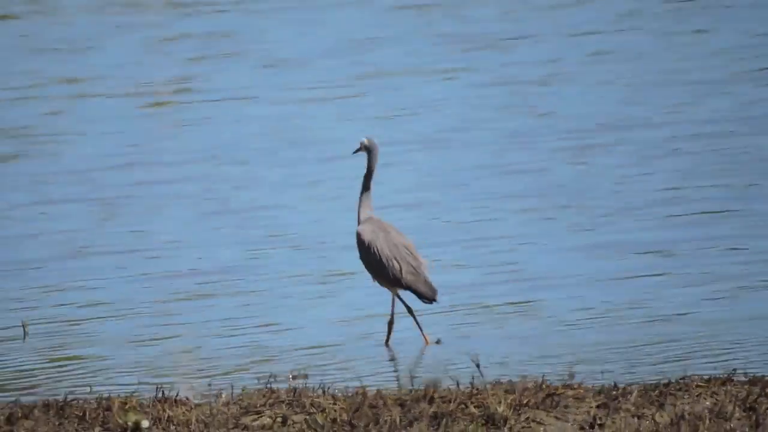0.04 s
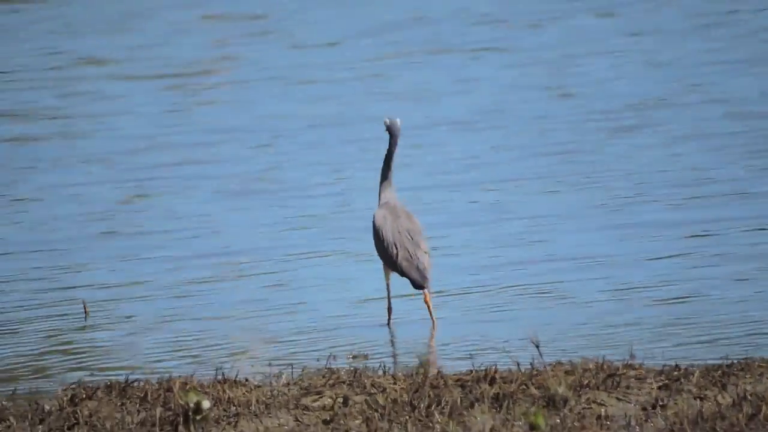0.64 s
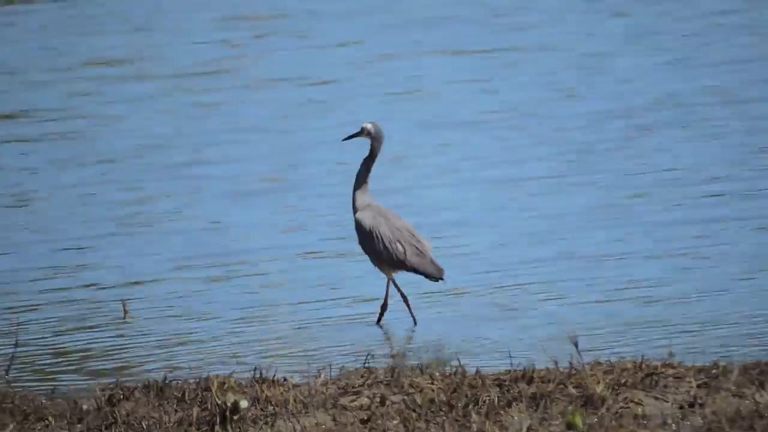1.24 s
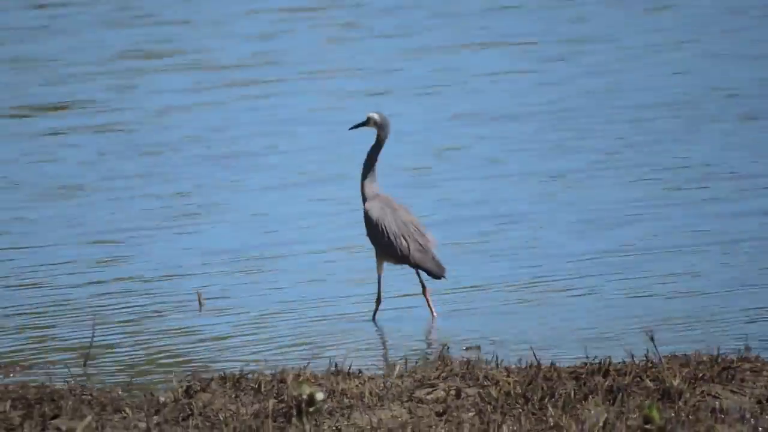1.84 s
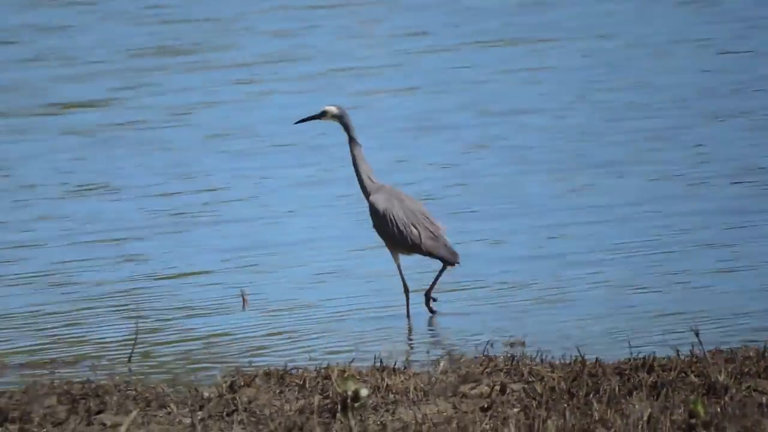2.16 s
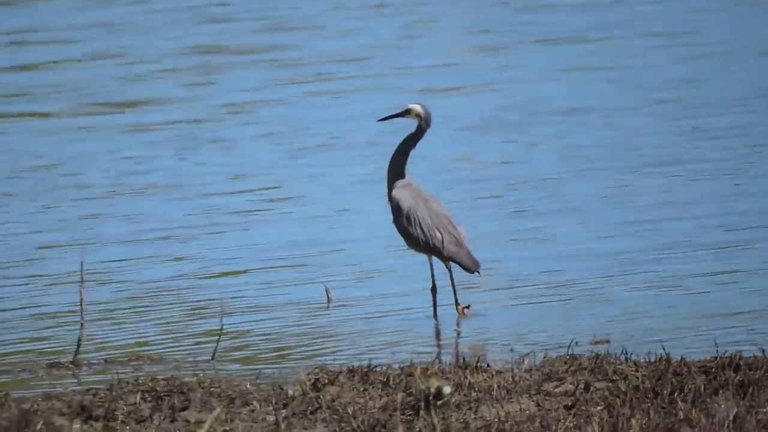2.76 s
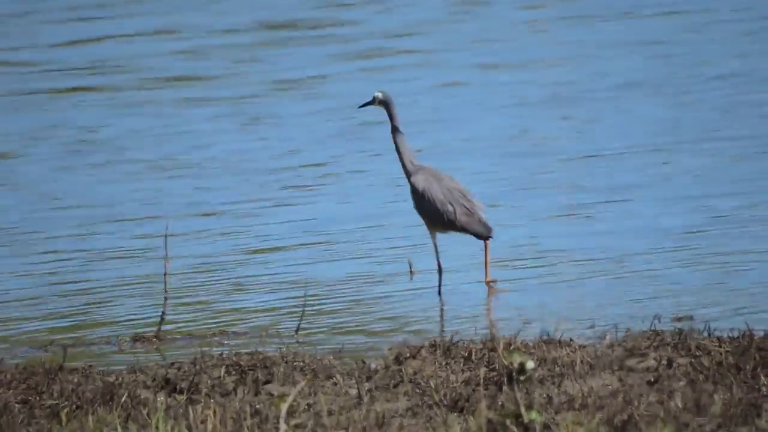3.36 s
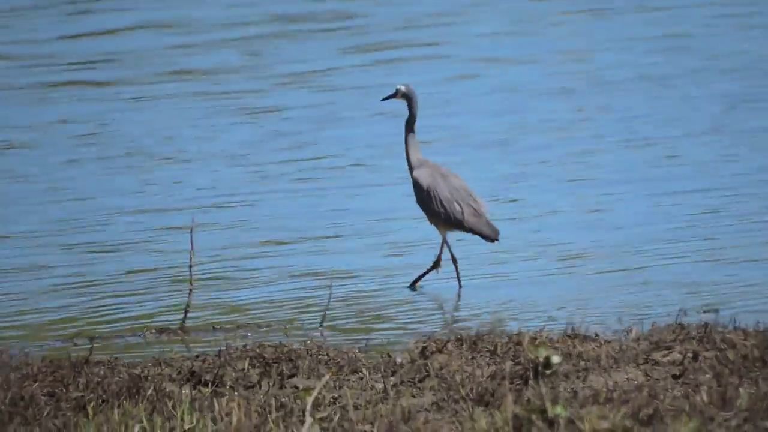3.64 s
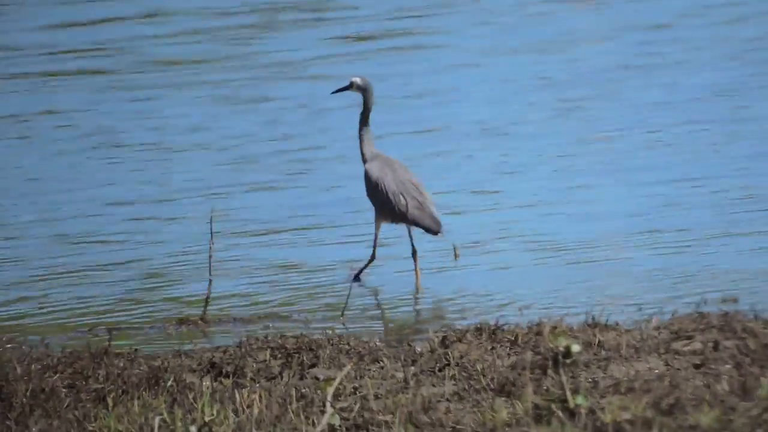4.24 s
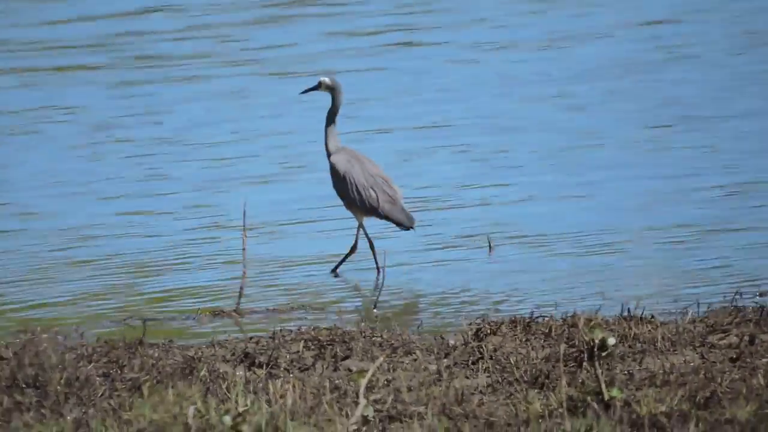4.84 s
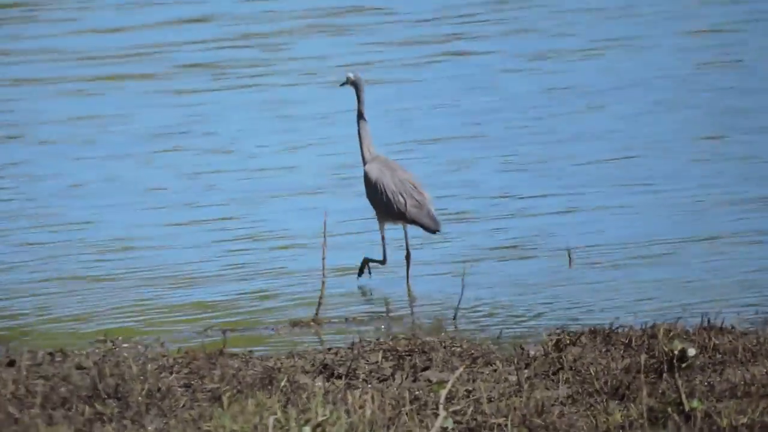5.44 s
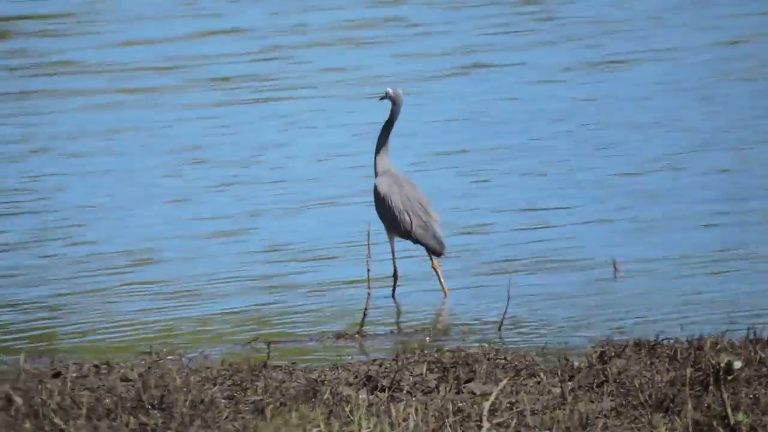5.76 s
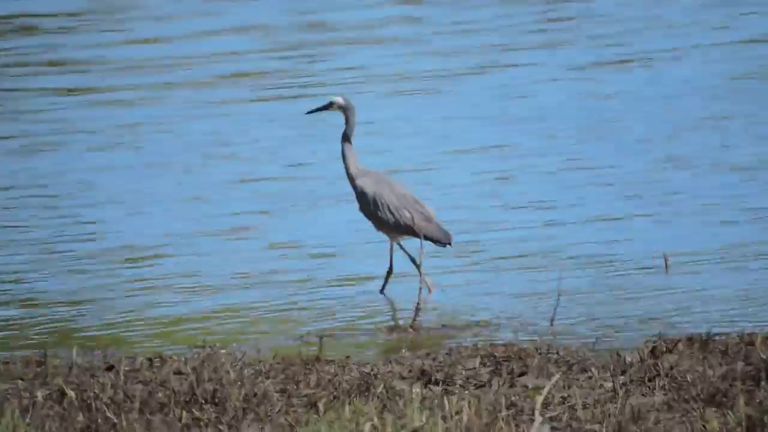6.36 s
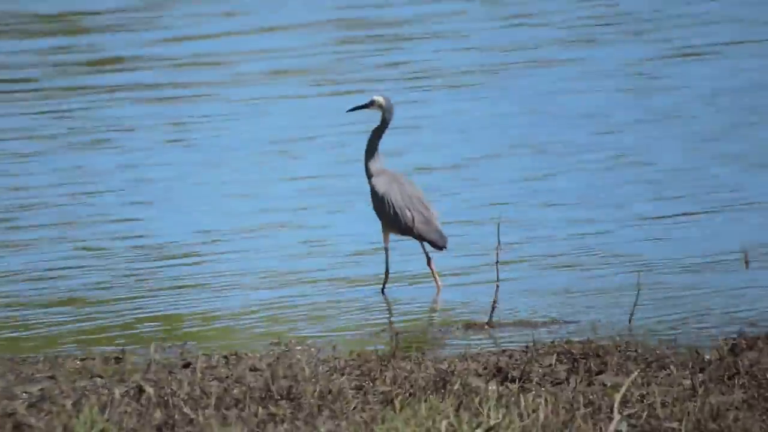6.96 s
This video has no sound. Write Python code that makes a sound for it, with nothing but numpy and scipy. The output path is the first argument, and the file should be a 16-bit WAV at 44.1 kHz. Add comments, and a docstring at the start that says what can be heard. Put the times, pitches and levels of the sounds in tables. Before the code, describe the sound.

Light wind rumbles on the microphone over a soft waterside hush, while one bird chirps nearby and others twitter far off.

```python
"""Chirps on a breezy lake shore

Close to the microphone a small bird gives three short stepped chirps, which the bank and shrubs scatter
back. A second bird calls a rising pair of notes; others twitter and whistle farther off. A light breeze
buffets the two microphone ports in turn, over the even hush of distant air and water."""
import sys
import numpy as np
from scipy import signal
from scipy.fft import rfft, irfft, next_fast_len
from scipy.io import wavfile
from scipy.ndimage import map_coordinates

SR = 44100
rng = np.random.default_rng(int(sys.argv[2]) if len(sys.argv) > 2 else 0)


def transcribe(signal):
    """Save signal, clipped to [-1, 1], as a 16-bit WAV file at the path in sys.argv[1]."""
    frames = np.atleast_2d(signal).T
    limited = np.clip(frames, -1, 1)
    pcm = np.round(limited * 32767).astype(np.int16)
    wavfile.write(sys.argv[1], SR, pcm)


N = 308700


def amp(db):
    """Decibels to gain."""
    return 10 ** (np.asarray(db) / 20)

def unit(x):
    """Scaled to rms 1."""
    return x / np.sqrt(np.mean(x ** 2) + 1e-20)

def along(points, hz):
    """Interpolate (frequency, value) points on a log frequency axis."""
    freqs, values = np.transpose(points)
    return np.interp(np.log(hz + 1), np.log(freqs + 1), values)

def wobble(rate_hz, size):
    """A smooth random curve with rate_hz knots a second."""
    knots = rng.standard_normal(int(size * rate_hz / SR) + 4)
    return map_coordinates(knots, [np.arange(size) * rate_hz / SR])

def filtered(x, response):
    """Shape x by a frequency response."""
    size = next_fast_len(N + SR // 2)
    return irfft(rfft(x, size) * response(np.fft.rfftfreq(size, 1 / SR)), size)[..., :N]

def panned(pan_db):
    """Left and right gains of constant power; positive pan_db is to the left."""
    gains = amp(np.array([np.atleast_1d(pan_db), -np.atleast_1d(pan_db)]) / 2)
    return gains / np.sqrt(np.mean(gains ** 2, axis=0))

def add(out, start_s, sound):
    """Mix a stereo sound in at start_s."""
    span = out[:, max(round(start_s * SR), 0):][:, :sound.shape[1]]
    span += sound[:, :span.shape[1]]

def lagged(x, lag):
    """The left port trails the right by lag(hz) radians."""
    return filtered(x, lambda hz: np.exp(.5j * np.array([-lag(hz), lag(hz)])))


# Spectrum of the open shore: frequency_hz, relative_db
HUSH_SPECTRUM = [(120, -41), (200, -3.5), (211, -2.5), (231, -3.5), (316, -1.5), (352, -2.5), (393, -4.5),
                 (577, -8.5), (731, -9.5), (944, -11.5), (1960, -11), (3990, -14.5), (8140, -20.5),
                 (13100, -26), (15700, -30)]
# How alike the hush is at the two ports: frequency_hz, correlation
HUSH_LIKENESS = [(100, 0.73), (500, 0.42), (1500, 0.21), (4000, 0.27), (8000, 0.412), (14000, 0.43)]

def hush(level_db):
    """Even noise of distant air and water, partly alike on both sides."""
    def colour(hz):
        width = np.arccos(along(HUSH_LIKENESS, hz)) / 2
        return amp(along(HUSH_SPECTRUM, hz)) * [np.cos(width), np.sin(width)]
    mid, side = filtered(rng.standard_normal((2, N)), colour)
    return unit(np.array([mid + side, mid - side])) * amp(level_db)

def drone(centre_hz, width_hz, level_db, swell_db, pan_db):
    """A faint band of noise that swells and sinks."""
    band = filtered(rng.standard_normal((2, N)), lambda hz: 1 / (1 + ((hz - centre_hz) / width_hz) ** 2))
    return unit(band) * amp(level_db + swell_db * wobble(3.98, N)) * panned(pan_db)


# The breeze at the microphone: time_s, level_db, pan_db
GUSTS = [(0, -39.5, 11), (.17, -48, 4.5), (.68, -49.5, -1), (.98, -44.5, -6), (1.1, -32, -7),
         (1.45, -32, -0.5), (1.68, -42.5, -15), (2.3, -34.5, -5), (2.5, -42.5, 0.5), (2.85, -42, 0),
         (3.13, -30, -15.5), (3.44, -34, -15), (3.87, -45, -13), (4.35, -36.5, -18), (4.65, -38.5, -8.5),
         (5.3, -47.5, -5), (5.81, -32, 5.5), (5.93, -45.5, 0.5), (6.3, -34.5, 9), (6.55, -38.5, -3),
         (6.7, -35.5, 20), (6.85, -33, -19), (7, -45, -7)]
# Spectrum of the turbulence at a port: frequency_hz, relative_db
RUMBLE_SPECTRUM = [(8.8, -18), (15, -7), (38, 2.5), (70, -1), (148, -17), (198, -27.5), (260, -32),
                   (340, -45), (570, -120)]

def buffeting(gain_db, lump_db, corner_hz, dulling_db):
    """Turbulence rumbles in each port separately, in quick lumps; stronger gusts are slightly duller."""
    time_s, level_db, pan_db = np.transpose(GUSTS)
    t = np.arange(N) / SR
    gust_db = np.interp(t, time_s, level_db)
    sides = panned(np.interp(t, time_s, pan_db))
    rumble = unit(filtered(rng.standard_normal((2, N)), lambda hz: amp(along(RUMBLE_SPECTRUM, hz))))
    deep = filtered(rumble, lambda hz: 1 / (1 + (hz / corner_hz) ** 4))
    strength = unit(gust_db - gust_db.mean())
    fine = (rumble - deep) * amp(dulling_db * (1 - strength))
    lumps = amp(lump_db * np.array([wobble(25, N), wobble(25, N)]))
    return (deep + fine) * unit(lumps) * amp(gust_db + gain_db) * sides


# Single eddies that thump a microphone port: centre_s, level_db, half_width_s, port
PORT_THUMPS = [(1.068, -16.5, 0.0039, "left"), (1.421, -20, 0.0048, "left"), (1.843, -26, 0.0028, "right"),
               (2.149, -23.5, 0.0048, "left"), (2.303, -21, .0045, "right"),
               (3.363, -21.5, 0.0035, "right"), (4.583, -21.5, 0.0031, "left"),
               (5.476, -26, 0.0034, "left"), (5.843, -23.5, 0.003, "left"), (6.289, -26.5, 0.0024, "left"),
               (6.662, -20, 0.0033, "left"), (6.697, -23, 0.0049, "left")]

def eddies(top_hz, wake_hz, wake_s, wake_db, pan_db):
    """An eddy crossing a port is a short dip of pressure with a slower rebound, amid churning air."""
    out = np.zeros((2, N))
    t = np.arange(-SR // 10, SR // 10) / SR
    noise = rng.standard_normal(N)
    churn = unit(filtered(noise, lambda hz: (hz / wake_hz) ** 2 / (1 + (hz / wake_hz) ** 6)))
    for centre_s, level_db, half_width_s, port in PORT_THUMPS:
        u = t / half_width_s
        dip = (u ** 2 - 1) / (1 + u ** 2) ** 2
        wake = amp(wake_db) * np.exp(-(t / wake_s) ** 2 / 2) * churn[round(centre_s * SR):][:len(t)]
        sides = panned(pan_db if port == "left" else -pan_db)
        add(out, centre_s + t[0], amp(level_db) * sides * (dip + wake) * np.hanning(len(t)))
    return filtered(out, lambda hz: 1 / (1 + (hz / top_hz) ** 6))


def song(glides, overtone_db, waver, flutter_db, edge_s, edge_share, purity_db_per_octave=0, pace=1):
    """A bird whistles each glide as a nearly pure tone through three pitches; pace < 1 hurries its start."""
    out = np.zeros((2, N))
    for start_s, length_s, start_hz, middle_hz, end_hz, level_db, fade_db, pan_db in glides:
        u = np.linspace(0, 1, max(int(length_s * SR), 64))
        hz = np.polyval(np.polyfit([0, .5, 1], [start_hz, middle_hz, end_hz], 2), u ** pace)
        phase = 2 * np.pi * np.cumsum(hz * (1 + waver * wobble(400, len(u)))) / SR
        ramp = np.clip(np.minimum(u, 1 - u) / (edge_s / length_s + edge_share), 0, 1)
        envelope = np.sin(ramp * np.pi / 2) * amp(level_db + fade_db * u + flutter_db * wobble(162, len(u)))
        octaves_below = np.maximum(np.log2(5500 / hz), 0)
        overtone = amp(overtone_db - purity_db_per_octave * octaves_below) * np.sin(2 * phase)
        add(out, start_s, panned(pan_db) * envelope * np.sqrt(2) * (np.sin(phase) + overtone))
    return out

def shore(x, delay_s, bank_db, bank_t60_s, shrubs_db, shrubs_t60_s):
    """The bank scatters sound back after a short trip; farther shrubs leave a longer tail."""
    t = np.arange(SR // 2) / SR
    def scatter(t60_s):
        decay = amp(-60 * t / t60_s) * (t > delay_s)
        return unit(rng.standard_normal((2, len(t))) * decay) / np.sqrt(len(t))
    echoes = amp(bank_db) * scatter(bank_t60_s) + amp(shrubs_db) * scatter(shrubs_t60_s)
    return x + signal.fftconvolve(x, echoes, axes=1)[:, :N]

def chatter(start_s, end_s, pitch_hz, level_db, count):
    """A bird far across the water runs through short slurred notes."""
    glides = []
    for k, (late, high, bend, loud) in enumerate(rng.standard_normal((count, 4))):
        hz = pitch_hz * (1 + .039 * high)
        onset_s = start_s + (end_s - start_s) * (k + .14 * late) / count
        pitches = hz * (1 + .058 * bend), hz, hz * (1 - .078 * bend)
        glides.append((onset_s, .04, *pitches, level_db + 2.2 * loud, 0, 0))
    return glides

def piping(start_s, period_s, length_s, pitch_hz, sag_hz, level_db, count):
    """A distant bird pipes a row of even whistles, each a little lower; the last is 6 dB fainter."""
    return [(start_s + k * period_s, length_s, *[pitch_hz - k * sag_hz] * 3,
             level_db - 6 * (k == count - 1), 0, -2) for k in range(count)]


# Slurred notes from far off: start_s, length_s, start_hz, end_hz, level_db, pan_db
FAR_NOTES = [(0.158, .045, 3040, 3100, -68, -8), (0.278, 0.051, 4300, 4210, -65, 5),
             (.315, 0.11, 3970, 3750, -62, 14), (0.869, 0.029, 3150, 3150, -60, 0),
             (0.973, .085, 5120, 4450, -64.5, 5), (1.15, .075, 4240, 4220, -63, 13),
             (1.506, 0.027, 4220, 3650, -63.5, 10), (1.525, 0.043, 3080, 3210, -62.5, -1.5),
             (1.655, .04, 5010, 5090, -67, 0), (1.889, .032, 2980, 2850, -64, -10),
             (2.985, .015, 6200, 5000, -62, 0), (3.163, 0.014, 4720, 3800, -61, 0),
             (4.266, 0.022, 629, 670, -58, 3)]

def distant_birds():
    """Twitter, piping and chatter reach the microphone faintly, with the longest echo."""
    glides = [(start_s, length_s, start_hz, (start_hz + end_hz) / 2, end_hz, level_db, 0, pan_db)
              for start_s, length_s, start_hz, end_hz, level_db, pan_db in FAR_NOTES]
    glides += piping(.752, period_s=.187, length_s=.078, pitch_hz=2220, sag_hz=20.7, level_db=-66, count=4)
    glides += chatter(.13, 1.8, pitch_hz=4700, level_db=-68.5, count=6)
    glides += chatter(2.05, 3.6, pitch_hz=2920, level_db=-72, count=3)
    glides += chatter(5.4, 6.8, pitch_hz=2280, level_db=-73.5, count=36)
    voices = song(glides, overtone_db=-32, waver=.007, flutter_db=.1, edge_s=.00078, edge_share=.1)
    direct = lagged(voices, lambda hz: hz / 3200)
    return shore(direct, delay_s=.011, bank_db=-9.5, bank_t60_s=.19, shrubs_db=-12.5, shrubs_t60_s=.51)


# A double call from close by: start_s, pitch_hz, level_db, pan_db
DOUBLE_CALL = [(3.141, 2867, -48, -5), (3.175, 3120, -50.5, -.5)]

def second_bird(climb_s=.013, climb_share=.062, flick_s=.0081, top_hz=4200, flick_db=-2, fade_db=-12):
    """Each of two notes climbs gently and ends in a fading upward flick."""
    glides = []
    for start_s, hz, level_db, pan_db in DOUBLE_CALL:
        low_hz, high_hz = hz * (1 - climb_share), hz * (1 + climb_share)
        flick_hz = high_hz, np.sqrt(high_hz * top_hz), top_hz
        glides.append((start_s, climb_s, low_hz, hz, high_hz, level_db, 0, pan_db))
        flick_start_s = start_s + climb_s - flick_s / 2
        glides.append((flick_start_s, flick_s, *flick_hz, level_db + flick_db, fade_db, pan_db))
    voice = song(glides, overtone_db=-28, waver=.013, flutter_db=3.5, edge_s=.00085, edge_share=.12)
    direct = lagged(voice, lambda hz: -hz / 2900)
    return shore(direct, delay_s=.0064, bank_db=-8.5, bank_t60_s=.11, shrubs_db=-10, shrubs_t60_s=.37)


# The near bird's sound bends round the camera body to the left port: frequency_hz, lag_rad
PORT_DELAY = [(3000, 1.5), (4200, 1.65), (4900, 1.8), (5500, 1.4), (6200, 1.2), (12000, 1.2)]
# The top note falls in two glides: length_s, start_hz, middle_hz, end_hz, relative_db, fade_db
TOP_GLIDES = [(.022, 6350, 6176, 6180, -1, -2), (.024, 5960, 5890, 5660, -5.5, -3.5)]
# The closing downward flick: start_hz, knee_hz, end_hz
FLICK_PITCHES = (5460, 4430, 3870)
# Three chirps near the microphone; the lead spans the opening note and the step:
# start_s, lead_s, opening_hz, opening_db, top_db, flick_db, opening_pan_db
NEAR_CHIRPS = [(.326, .037, 5450, -49.5, -44, -46.5, -1.5), (3.238, .0365, 5415, -46.5, -47.5, -47, 6),
               (6.339, .040, 4850, -32.5, -38.5, -34.5, 8)]

def near_bird(opening_share=.54, step_hz=5500, step_db=-1, flick_s=.019, flick_fade_db=-12):
    """Each chirp opens on its own pitch, steps up, leaps to the top note and flicks down."""
    step_pitches = step_hz * (1 + .017 * np.array([-1, 0, 1]))
    openings, middles, flicks = [], [], []
    for start_s, lead_s, opening_hz, opening_db, top_db, flick_db, pan_db in NEAR_CHIRPS:
        opening_s = lead_s * opening_share
        rim_hz = opening_hz * 1.028  # the opening note sags from here and recovers
        openings.append((start_s, opening_s, rim_hz, opening_hz, rim_hz, opening_db, 0, pan_db))
        start_s += opening_s
        step = (lead_s - opening_s, *step_pitches, step_db, 0)
        for length_s, *pitches, relative_db, fade_db in [step, *TOP_GLIDES]:
            middles.append((start_s, length_s, *pitches, top_db + relative_db, fade_db, 0))
            start_s += length_s
        flicks.append((start_s, flick_s, *FLICK_PITCHES, flick_db, flick_fade_db, 2.5))  # a little left
    voice = song(openings, overtone_db=-22, waver=.0054, flutter_db=-.7, edge_s=.002, edge_share=.13,
                 purity_db_per_octave=38)
    voice += song(middles, overtone_db=-21, waver=.0044, flutter_db=2.5, edge_s=.0011, edge_share=.04,
                  purity_db_per_octave=52.5)
    voice += song(flicks, overtone_db=-35, waver=.008, flutter_db=1, edge_s=.0012, edge_share=.04,
                  pace=.45)
    direct = lagged(voice, lambda hz: along(PORT_DELAY, hz))
    return shore(direct, delay_s=.0076, bank_db=-13.5, bank_t60_s=.11, shrubs_db=-17, shrubs_t60_s=.31)


def scene():
    """From one spot on the shore: birds near and far, wind on the microphone, the hush beyond."""
    birds = distant_birds() + second_bird() + near_bird()
    wind = buffeting(gain_db=.5, lump_db=3, corner_hz=72, dulling_db=.46)
    wind += eddies(top_hz=282, wake_hz=125.6, wake_s=.018, wake_db=-17, pan_db=18.5)
    slow_air = drone(centre_hz=23.7, width_hz=9.1, level_db=-44, swell_db=2.5, pan_db=-3.5)
    distance = (drone(centre_hz=702, width_hz=48, level_db=-73, swell_db=4.5, pan_db=5)
                + drone(centre_hz=580, width_hz=610, level_db=-65, swell_db=.7, pan_db=15.5)
                + drone(centre_hz=165.6, width_hz=49, level_db=-59.5, swell_db=1.5, pan_db=-.5))
    return hush(level_db=-57) + distance + slow_air + wind + birds

def record(dry):
    """The camera keeps nothing above its band limit."""
    return filtered(dry, lambda hz: hz < 15750)


dry = scene()
out = record(dry)
transcribe(out)
```